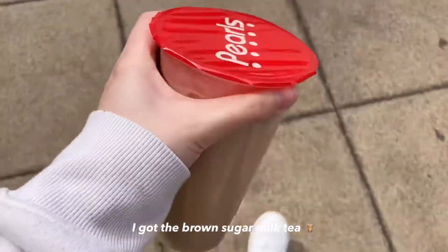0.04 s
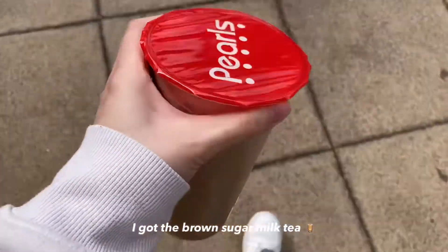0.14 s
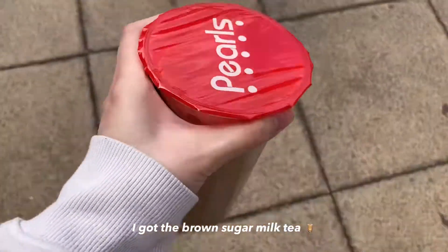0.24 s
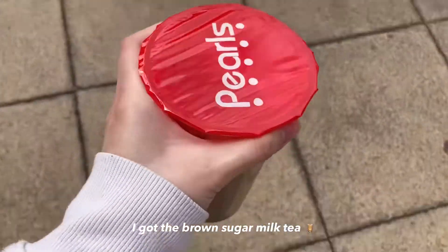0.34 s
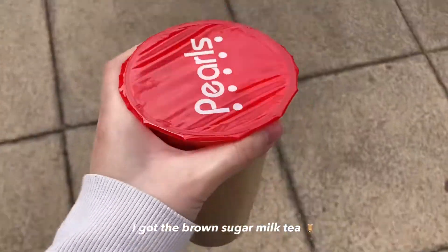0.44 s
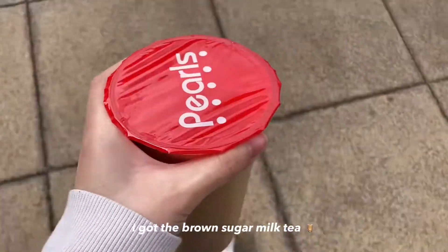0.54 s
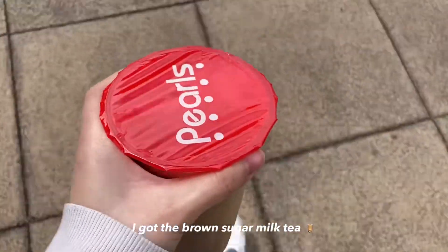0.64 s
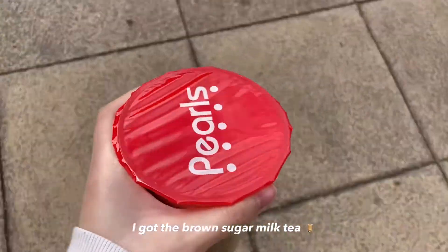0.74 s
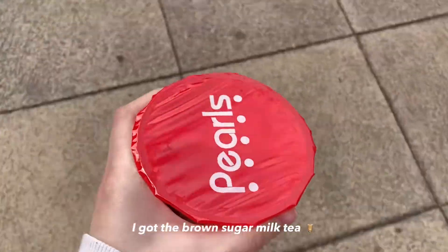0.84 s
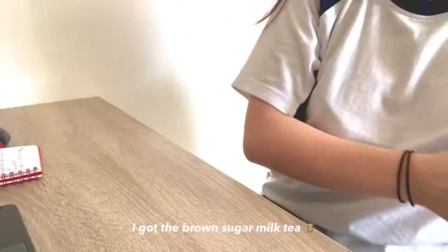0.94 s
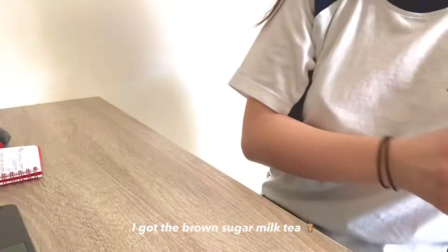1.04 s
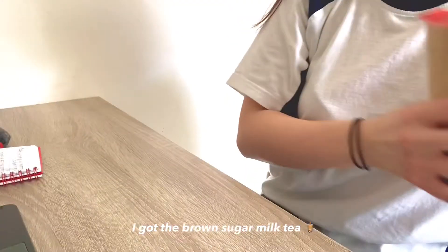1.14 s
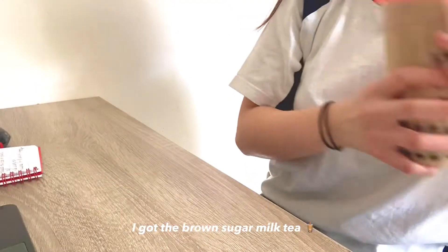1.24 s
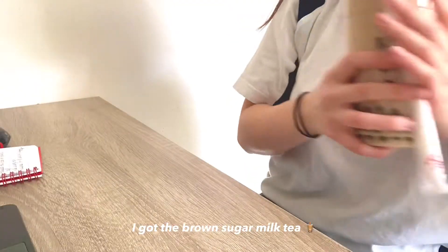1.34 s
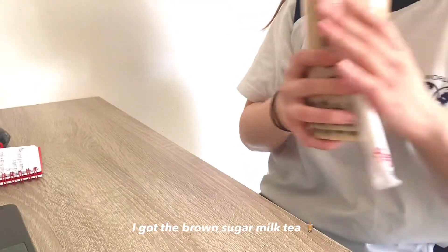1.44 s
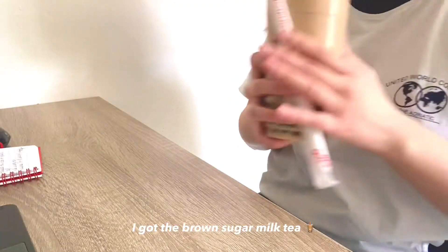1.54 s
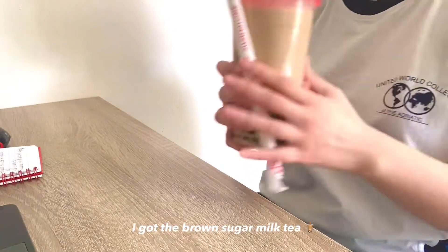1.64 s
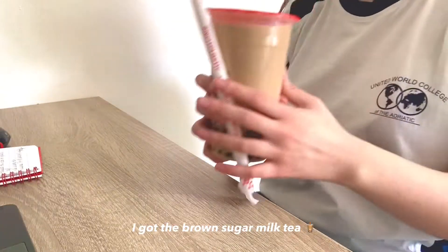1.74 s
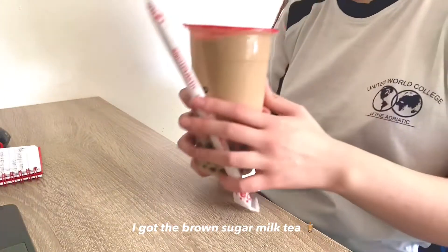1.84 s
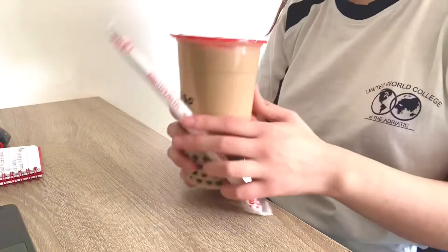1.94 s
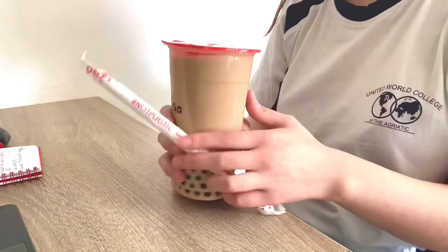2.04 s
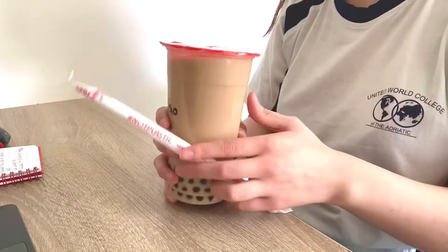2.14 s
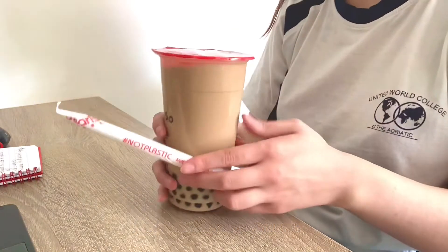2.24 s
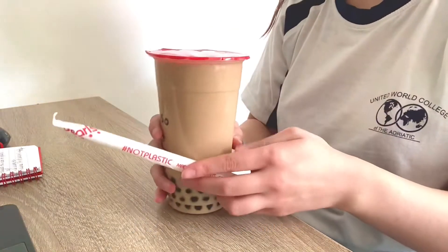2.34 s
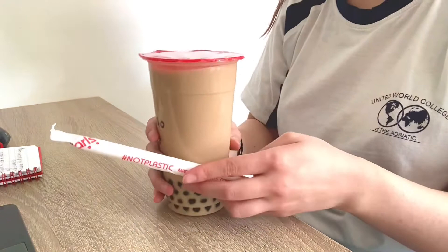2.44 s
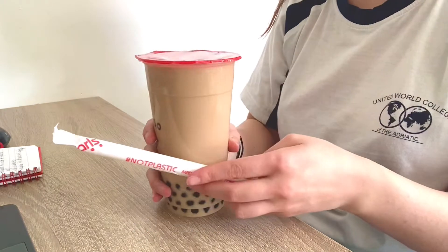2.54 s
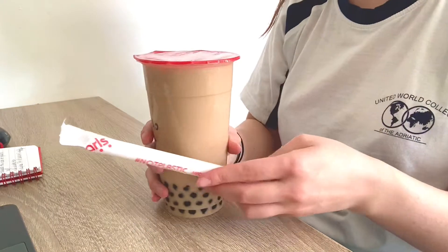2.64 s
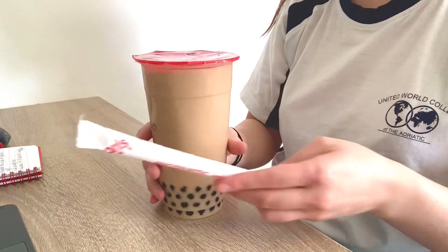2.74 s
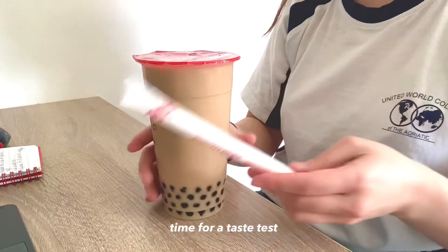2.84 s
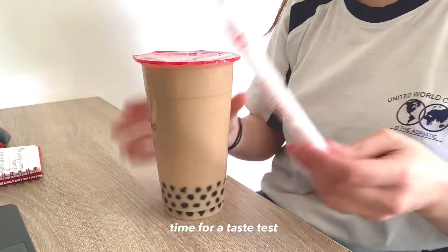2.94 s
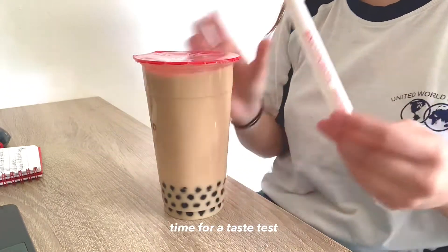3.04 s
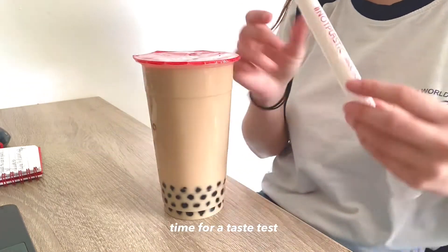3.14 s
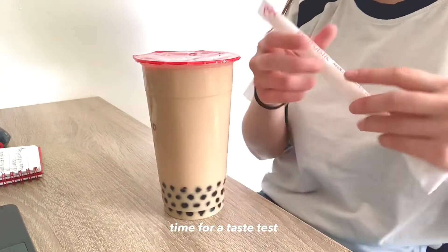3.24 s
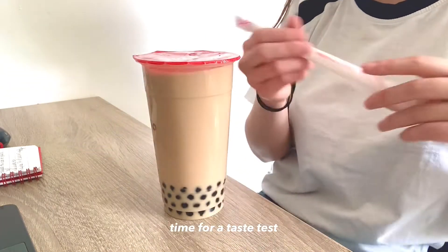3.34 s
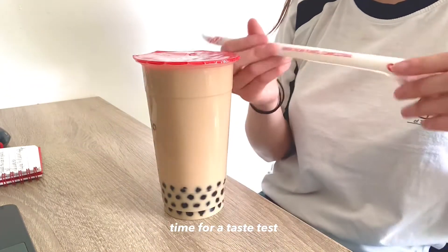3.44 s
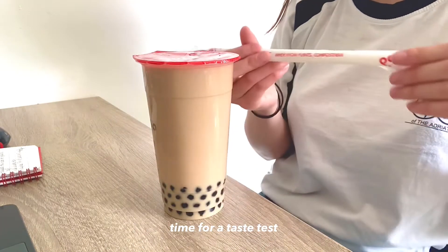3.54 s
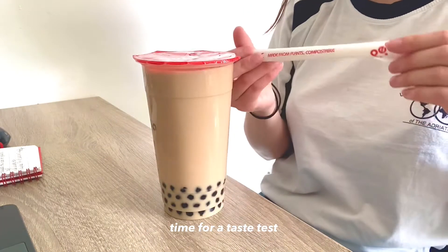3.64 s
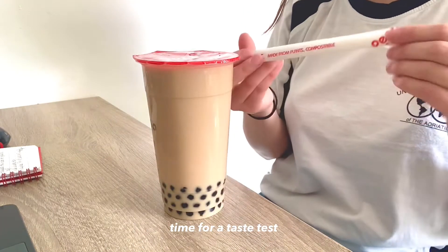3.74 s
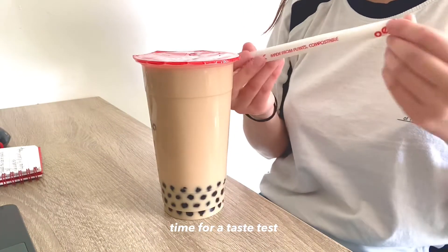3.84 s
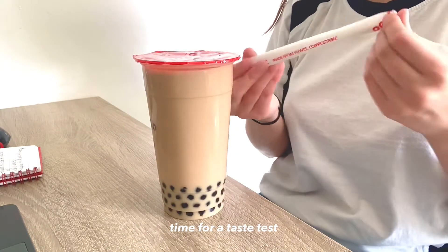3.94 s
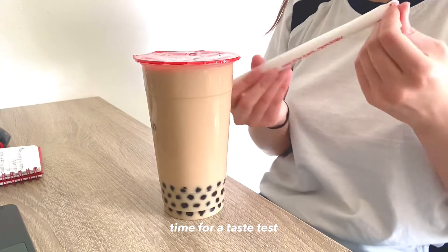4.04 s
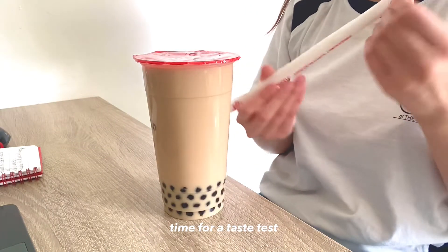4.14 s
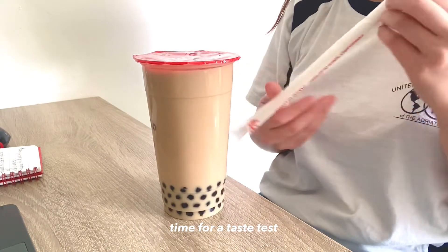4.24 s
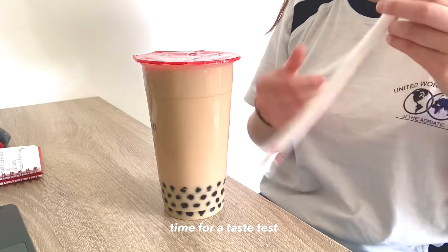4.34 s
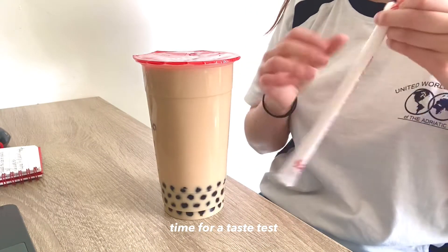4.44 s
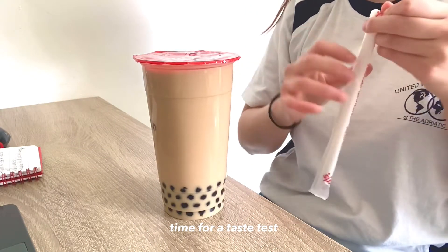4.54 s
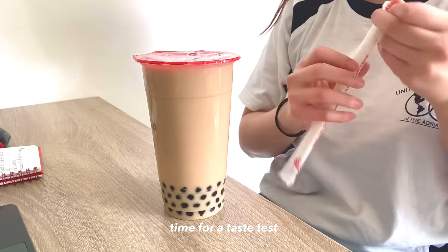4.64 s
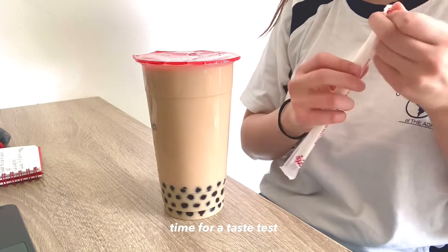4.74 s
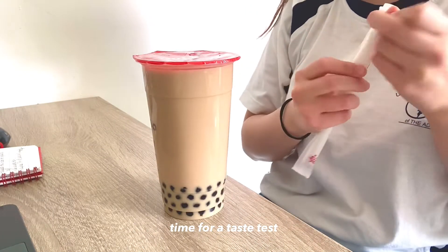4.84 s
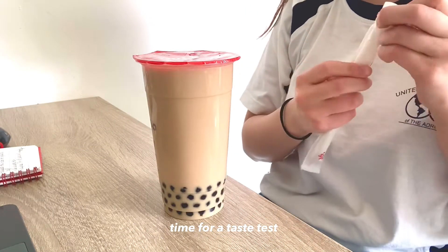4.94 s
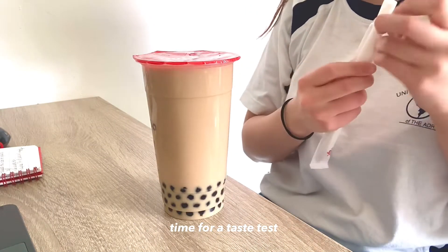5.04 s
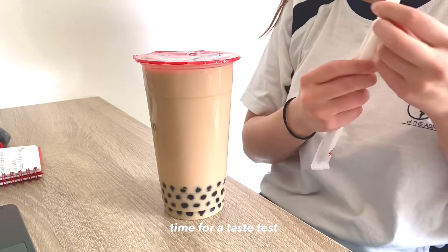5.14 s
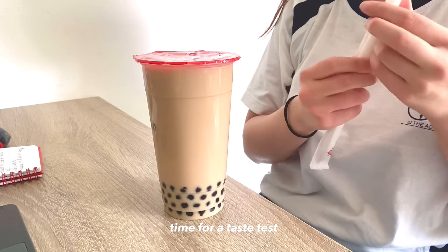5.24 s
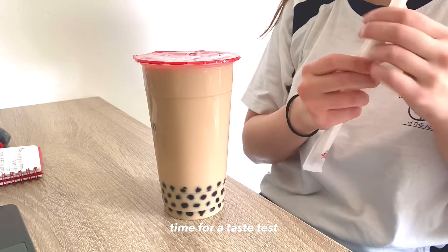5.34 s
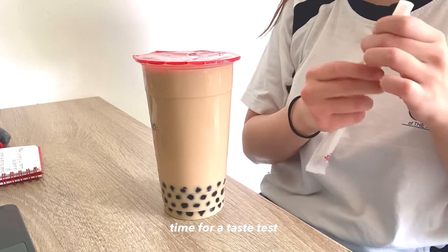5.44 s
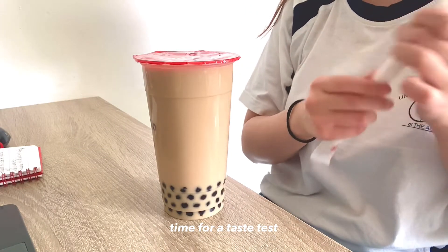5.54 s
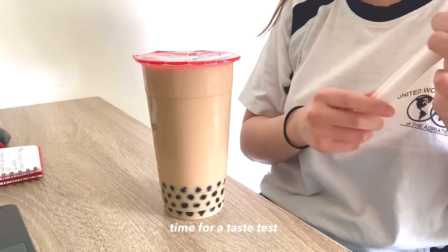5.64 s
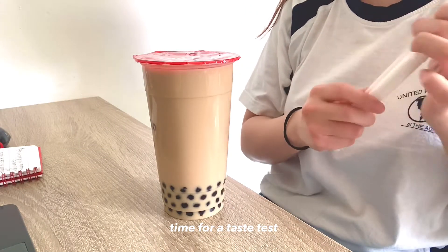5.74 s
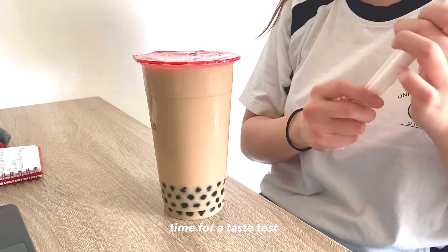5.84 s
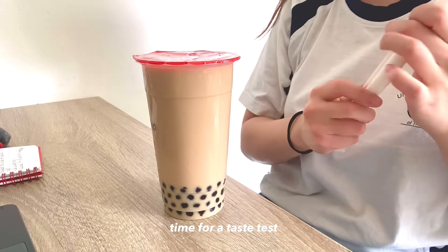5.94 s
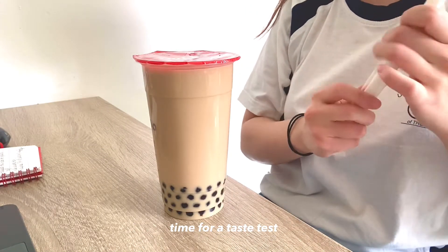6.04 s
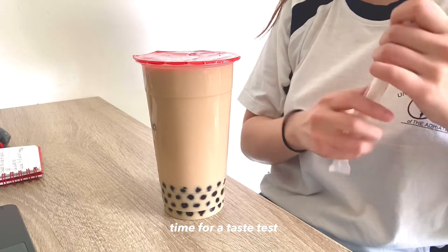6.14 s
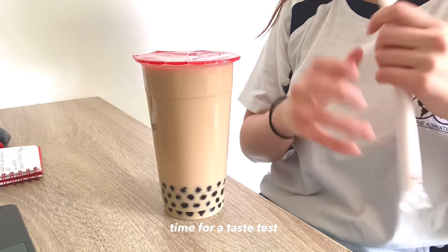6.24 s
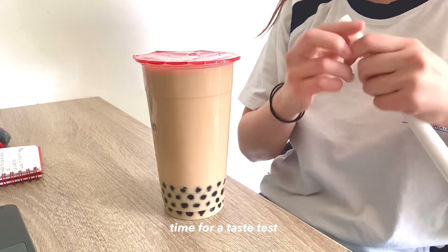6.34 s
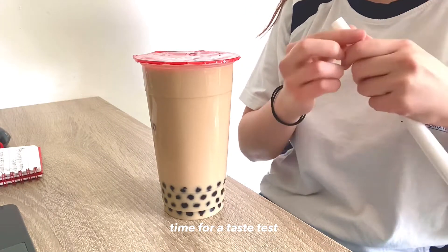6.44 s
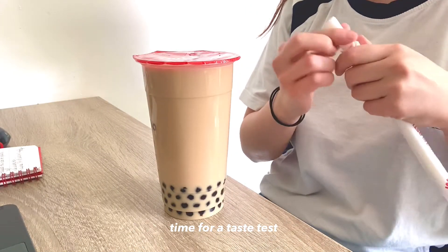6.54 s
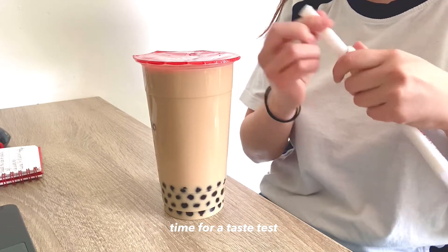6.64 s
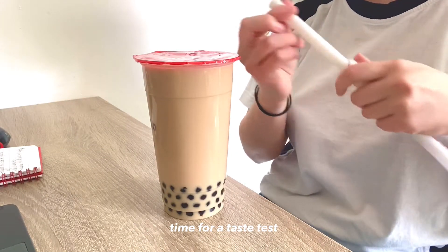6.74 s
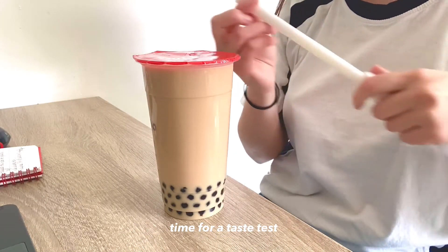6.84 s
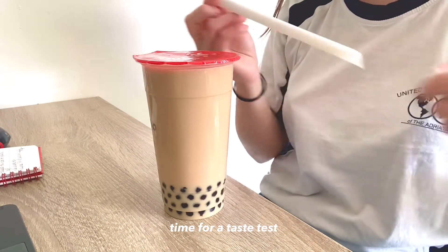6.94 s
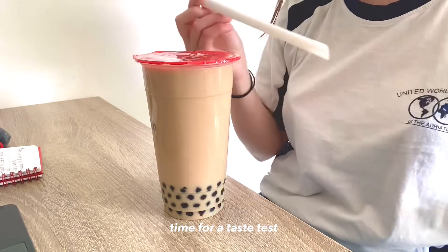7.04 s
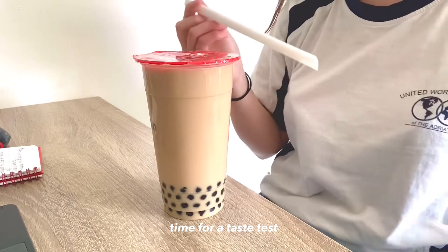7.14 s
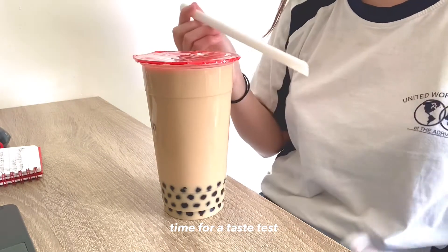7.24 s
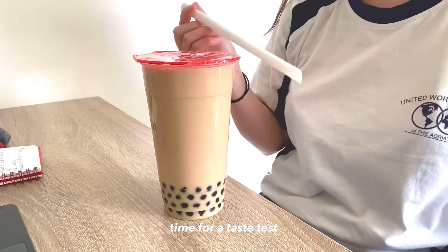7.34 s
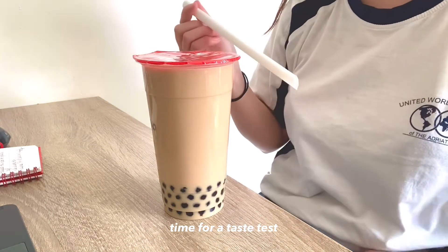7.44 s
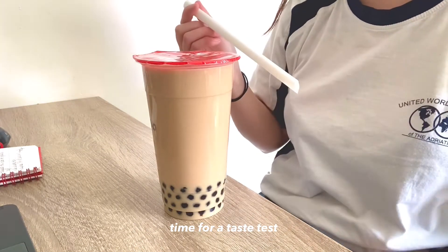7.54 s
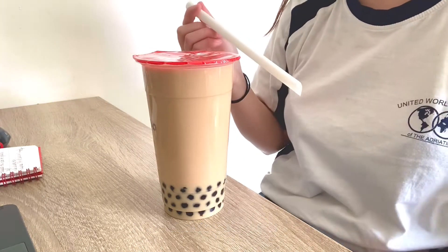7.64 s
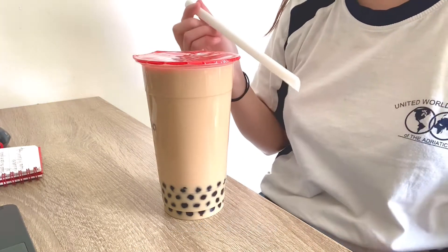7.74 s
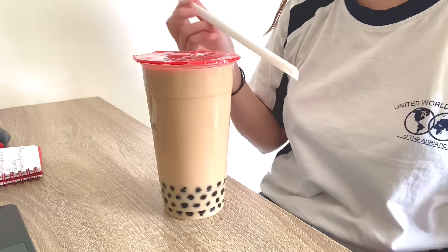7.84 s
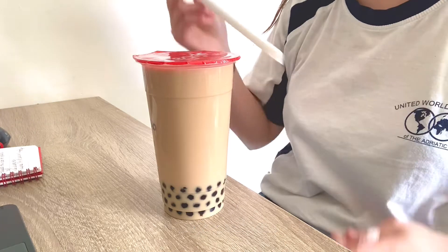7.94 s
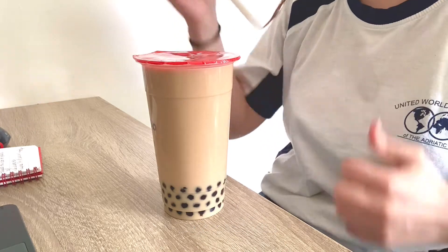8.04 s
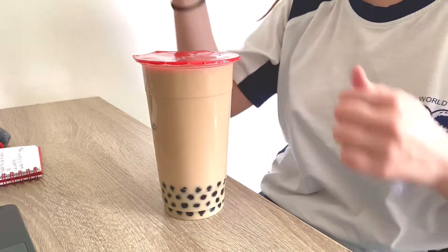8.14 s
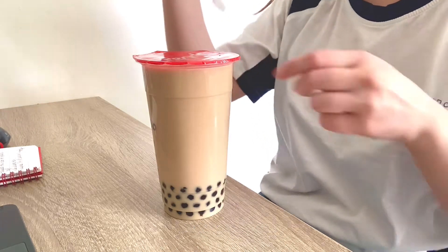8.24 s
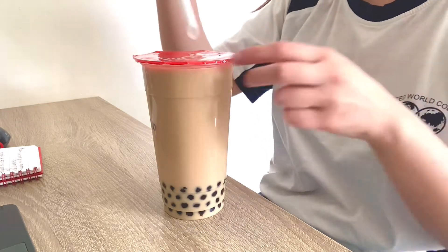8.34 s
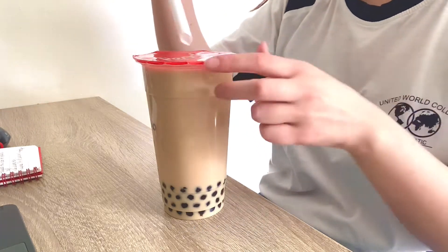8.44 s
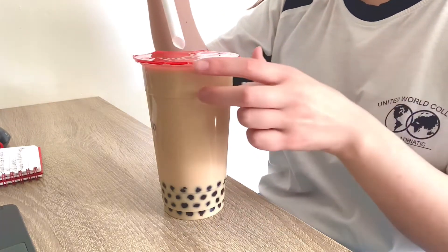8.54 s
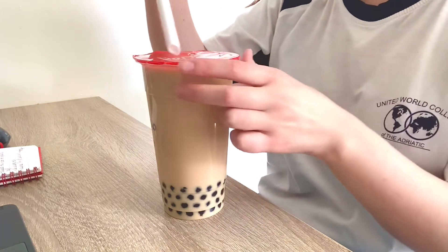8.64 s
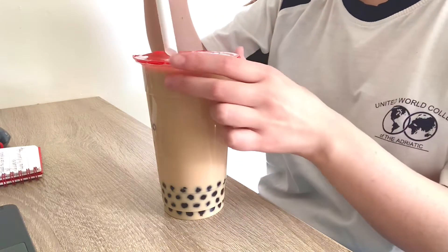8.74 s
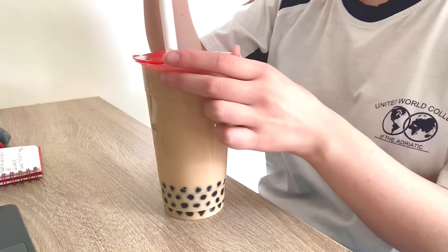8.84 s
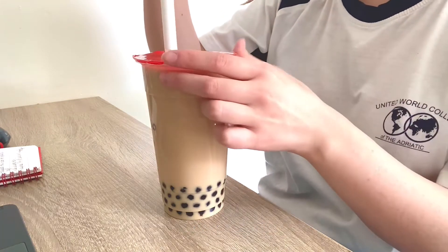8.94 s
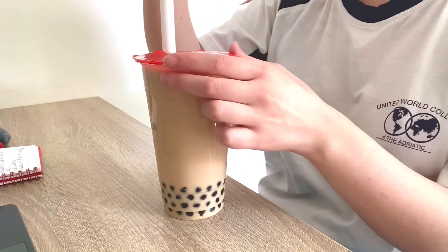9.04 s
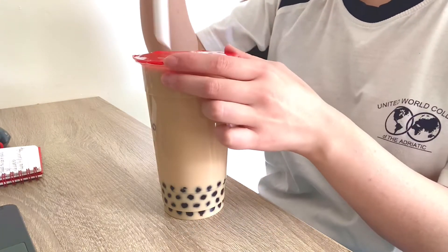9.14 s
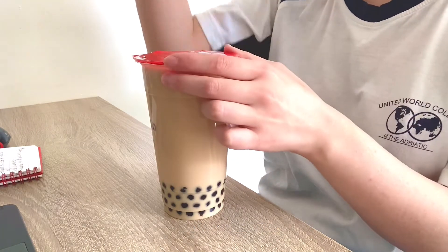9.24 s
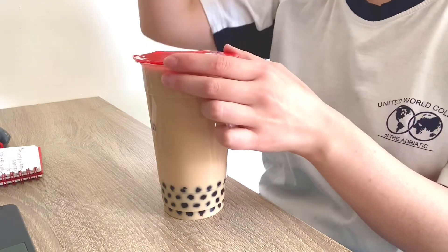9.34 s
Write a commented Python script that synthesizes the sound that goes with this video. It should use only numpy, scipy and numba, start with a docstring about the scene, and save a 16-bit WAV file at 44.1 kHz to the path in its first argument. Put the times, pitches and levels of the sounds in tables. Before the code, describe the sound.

From 0 to 0.9 seconds, low wind rumbles and buffets the microphone outdoors, strongest around 0.2, with faint film ticks. It cuts abruptly to a very quiet small room, heard close in stereo with a short tail. From 0.9 to 2 seconds, thin wrapping rustles and fingers tap and squeak on a plastic cup. Around 2.1 to 2.6 the full cup lands on the desk with dull, woody thuds and hollow knocks. After softer rustling, a crisp brush comes at 3.3; from 3.5 to 6.3 the wrapper crinkles in uneven bursts with sharp dry snaps, a stronger rub near 5.6. At 6.6 to 6.9 the straw slides out in a bright, growing hiss. Light brushing and crackles follow until 8.4. Short hollow pops with a tiny rattle strike the lid film at 8.7, with a faint desk bump, and again at 9.1, then a last small tick.

```python
"""First, wind rumbles on the microphone outdoors, as filtered noise whose bands swell with its eddies.
Then, at a desk in a small room, a full plastic cup is set down: the desk rings in decaying sine waves.
A wide straw is worked out of its thin wrapper: tiny ringing grains make the crinkling, the finger rub
and the hiss of the straw sliding out, while short noise bursts make the snapping creases.
At the end its tip pops through the taut film that seals the cup: brief tones with a rattle."""
import sys
import numpy as np
from scipy import signal
from scipy.fft import rfft, irfft
from scipy.io import wavfile
from scipy.ndimage import uniform_filter1d, map_coordinates
from numba import njit

SR = 44100
rng = np.random.default_rng(int(sys.argv[2]) if len(sys.argv) > 2 else 0)


def transcribe(u):
    """Save the signal u as a 16-bit wav file named by the first command-line argument.

    u: samples, shape (n,) or (channels, n), limited to [-1, 1]; the rate is SR.
    q: integer samples, one column per channel.
    """
    v = np.clip(np.atleast_2d(u).T, -1, 1)
    q = np.round(v * 32767).astype(np.int16)
    wavfile.write(sys.argv[1], SR, q)


N = 414981
T = np.arange(N) / SR  # time of every sample, in seconds

# Tone colour of the wind: pitch_hz, relative_level_db
WIND_SPECTRUM = [(20, -10), (60, 9.5), (300, -3), (470, -7.5), (700, -22), (1500, -28), (4000, -40),
                 (16000, -48)]
# Strength of the wind over time: time_s, level_db
WIND_GUST = [(0, -46.5), (.11, -42.5), (.18, -36.5), (.36, -43)]
# Tone colour of the quiet room: pitch_hz, relative_level_db
ROOM_SPECTRUM = [(20, -33), (50, 6.5), (90, -6), (145, 0), (300, -10), (1500, -22), (16000, -35.5)]
# Ringing modes of the desk: pitch_hz, relative_level_db, time_to_fall_60_db_s
DESK_MODES = [(49.6, -1, 0.33), (82, 1.5, 0.16), (134.3, 0.5, 0.26), (207, -4, 0.21), (294, 7, 0.075)]
# The cup and the hands bump the desk: start_s, relative_level_db, contact_s
DESK_BUMPS = [(2.061, -44.5, 0.014), (2.219, -44, 0.00092), (2.233, -26, 0.0047), (2.273, -37.5, 0.0038),
              (2.505, -41, 0.006), (8.703, -57.5, 0.0037)]
# Tone colour of the cup: pitch_hz, relative_level_db
CUP_SPECTRUM = [(100, -27), (330, 5.5), (470, 11), (740, -6.5), (2050, -0.5), (3000, -4.5), (4000, 0.5),
                (16000, -38)]
# Knocks on the cup or straw and pops of the lid: start_s, relative_level_db, pitch_hz
CUP_KNOCKS = [(1.219, -36, 1080), (1.6128, -41, 1230), (1.733, -43, 1310), (1.837, -38.5, 1400),
              (2.2437, -31.5, 1500), (2.2494, -36, 930), (2.5678, -40, 1580), (2.7161, -36, 1820),
              (2.736, -40, 1440), (5.324, -45, 2944), (6.914, -37.5, 1820), (7.2754, -43, 930),
              (8.686, -37, 1650), (8.7011, -32, 1700), (8.7055, -37.5, 1610), (9.1059, -37.5, 1900),
              (9.11, -33.5, 1800), (9.1332, -38.5, 1700), (9.1695, -36.5, 1760)]
# Plastic catches and slips in a quick run (fingers on the cup, wrapper on the straw, straw on the lid):
# start_s, length_s, level_db, pitch_hz
STICK_SLIPS = [(0.877, 0.09, -61.5, 3000), (1.417, 0.033, -57, 1130), (1.45, 0.018, -47.5, 1320),
               (3.352, 0.011, -42, 3860), (3.385, 0.05, -53.5, 844), (5.616, 0.014, -46, 2250)]
# The fingers pinch and crush the wrapper: start_s, hold_s, relative_level_db
PINCHES = [(1.203, 0.01, -40.5), (3.287, 0.019, -41), (3.578, 0.012, -49), (3.776, 0.038, -48),
           (3.868, 0.15, -51.5), (4.011, 0.039, -49), (4.178, 0.076, -48), (4.386, 0.025, -57.5),
           (4.597, 0.0087, -46.5), (4.645, 0.14, -55), (4.762, 0.047, -44.5), (4.83, 0.018, -43),
           (4.968, 0.1, -52.5), (5.144, 0.51, -55), (5.256, 0.053, -48.5), (5.317, 0.058, -49.5),
           (5.671, 0.013, -39), (5.742, 0.036, -37.5), (5.803, 0.037, -47), (6.062, 0.11, -44),
           (6.193, 0.023, -42.5), (6.285, 0.027, -51.5), (6.495, 0.08, -57), (7.127, 0.0059, -50.5),
           (8.655, .11, -54)]
# The wrapper is brushed along the straw or cup:
# start_s, length_s, relative_level_db, finger_rub_db (relative to that level)
STROKES = [(0.888, 0.42, -56, -5), (1.095, 0.63, -56.5, -9), (1.713, 0.63, -53.5, -6.5),
           (1.939, 0.11, -47.5, -5), (2.336, 0.28, -64.5, -3), (2.77, 0.29, -64.5, -10),
           (3.004, 1.31, -56.5, -10), (3.303, 0.18, -44.5, -8), (3.388, 0.063, -42, -18),
           (4.559, 0.044, -66, 0.5), (5.386, 0.29, -54.5, -18), (5.495, 0.18, -40, -11.5),
           (6.042, 0.069, -54, -5.5), (6.974, 0.092, -44, -23.5), (7.056, 1, -56, -10.5),
           (7.356, 0.11, -46, -5), (7.487, 0.21, -47, -7), (7.725, 0.21, -47, -11.5),
           (7.953, 0.087, -45, -17.5), (8.117, 0.16, -51, -26), (8.195, 0.08, -39, -27),
           (8.344, 0.081, -48.5, -16.5), (8.43, 0.23, -63.5, -13), (8.773, 0.3, -59, -11)]
# Tone colour of finger friction: pitch_hz, relative_level_db
FINGER_SPECTRUM = [(100, -19), (250, -11), (1200, -1), (2600, 3.5), (4300, -2), (9000, -32), (16000, -8)]
# Resonances of the air in the straw: pitch_hz, width_hz, relative_level_db
STRAW_RESONANCES = [(440, 120, -3), (900, 150, -4.5)]
# Creases of the lid film and wrapper that snap through: start_s, relative_level_db (over 1 ms)
CREASE_SNAPS = [(0.223, -53), (0.337, -57), (0.728, -44), (1.217, -35.5), (1.396, -36), (1.811, -35),
                (1.837, -38), (2.027, -30), (2.073, -37), (2.391, -39), (2.445, -45), (2.467, -41),
                (3.042, -43.5), (3.212, -42.5), (3.536, -40.5), (3.673, -38), (3.876, -36), (3.924, -34.5),
                (3.968, -34.5), (4.014, -34), (4.164, -41.5), (4.188, -36), (4.203, -40), (4.216, -39),
                (4.231, -29.5), (4.343, -38), (4.356, -31.5), (4.398, -38), (4.407, -40), (4.646, -35),
                (4.709, -40), (4.747, -35.5), (4.77, -31.5), (4.845, -39), (4.943, -36), (4.973, -33),
                (4.9998, -33), (5.0148, -36), (5.02, -35), (5.035, -37), (5.143, -38.5), (5.212, -43),
                (5.241, -35.5), (5.262, -35), (5.27, -31.5), (5.374, -35), (5.491, -35), (5.682, -31),
                (5.717, -34), (5.902, -43.5), (6.067, -32.5), (6.131, -43), (6.955, -37.5), (8.291, -35.5),
                (8.688, -36), (8.87, -38.5), (9.249, -43.5)]
# Tone colour of the crinkling wrapper: pitch_hz, relative_level_db
CRINKLE_SPECTRUM = [(900, -28.5), (2000, -4), (3800, -3.5), (7200, 0.5), (8800, 3), (11000, 1),
                    (14000, -0.5), (16000, -4)]
# Tone colour of the sliding straw: pitch_hz, relative_level_db
SLIDE_SPECTRUM = [(200, -59), (900, -27), (3500, -8.5), (7200, -4), (8600, 3.5), (11000, -0.5), (14000, 3),
                  (16000, -6.5)]

OUTDOORS_END_S = .883
WRAPPER_LAG_S, CUP_LAG_S = .000228, .0001  # how much later the left port hears each source
TOP_HZ = 15800
# A pinch builds quickly, sags while it is held and lets go
PINCH_ATTACK_S, PINCH_SAG_DB_PER_S, PINCH_RELEASE_S, PINCH_RUB_DB = 0.0011, 4, 0.022, -14
# A stroke swells and fades in an arch; a lower power makes it flatter
STROKE_ARCH_POWER = 0.39
# After any touch the sheet keeps unfolding, fainter and fainter
SETTLE_DB, SETTLE_DB_PER_S = -4.5, 169
# Level of the crinkling against the hiss of the sliding straw
CRINKLE_DB = -0.5
# The straw gathers speed as it is drawn out
SLIDE_START_S, SLIDE_END_S, SLIDE_EDGE_S = 6.565, 6.92, 0.027
SLIDE_DB, SLIDE_RISE_DB_PER_S, SLIDE_RUB_DB = -39.5, 13.5, -24
# Creases give way in little avalanches; the shares say how much of the crackle comes in such bursts
AVALANCHE_MEDIAN_GAP_S, AVALANCHE_DECAY_S = 1 / 85, .0014
PINCH_SHARE, STROKE_SHARE = .85, .25


def gain(db):
    """Turn decibels into a multiplying factor."""
    return 10 ** (np.asarray(db) / 20)


def unit(x):
    """Scale a sound to an average (rms) strength of 1."""
    return x / np.sqrt(np.mean(x ** 2))


def level_over(x, seconds):
    """Strength a sound would have if all its energy were packed into the given time."""
    return np.sqrt(np.sum(x ** 2) / (seconds * SR))


def walk(rate):
    """Wander at random with rms 1, by straight lines between `rate` random points a second."""
    knots = rng.standard_normal(4096)
    return unit(np.interp(T * rate, np.arange(len(knots)), knots))


def colour(x, points, size=4096):
    """Filter a sound to follow (Hz, dB) points, with no sound ahead of its cause (minimum phase)."""
    hz, db = np.transpose(points)
    f = np.maximum(np.fft.rfftfreq(size, 1 / SR), 1)
    log_gain = np.log(gain(np.interp(np.log(f), np.log(hz), db)))
    # fold the cepstrum forward in time to get the minimum-phase filter
    cepstrum = irfft(log_gain)
    cepstrum[1:size // 2] *= 2
    cepstrum[size // 2 + 1:] = 0
    impulse = irfft(np.exp(rfft(cepstrum)))
    return signal.fftconvolve(x, impulse)[:len(x)]


def resonate(x, hz, width_hz):
    """Pass a sound through one resonance with gain 1 at its centre."""
    return signal.lfilter(*signal.iirpeak(hz, hz / width_hz, fs=SR), x)


def add(track, start_s, sound):
    """Mix a sound into a track at its start time."""
    i = int(start_s * SR)
    track[i:i + len(sound)] += sound[:N - i]


def shift(x, depth_db, per_s, per_octave):
    """Resonances come and go as the sheet bends all the time; eddies do the same to moving air."""
    f, t, bands = signal.stft(x, SR, nperseg=512)
    octaves = np.log2(1 + f / 300)
    place = np.meshgrid(octaves * per_octave, t * per_s, indexing="ij")
    bends = map_coordinates(rng.standard_normal((96, 1024)), place, order=1, mode="wrap")
    return signal.istft(bands * gain(depth_db * bends), SR, nperseg=512)[1][:N]


@njit
def ring(starts, sizes, poles, count):
    """Ring each grain as a tiny damped oscillation, `count` samples long."""
    out = np.zeros(N + count)
    for k in range(len(starts)):
        z = sizes[k] + 0j
        for i in range(count):
            out[starts[k] + i] += z.real
            z *= poles[k]
    return out[:N]


def grains(rate, spread_db, width_hz=2200):
    """Fibres and tiny creases give way at random: many small, a few large, each with its own pitch."""
    when, size, pitch, side = rng.random((4, N))
    starts = np.flatnonzero(when < rate / SR)  # about `rate` grains a second
    excess = -np.log(np.maximum(size[starts], .03))
    sizes = gain(spread_db * excess) * np.sign(side[starts] - .5)
    # pitches reach up to 0.8 of half the sample rate; a greater width dies away faster
    poles = np.exp((1j * pitch[starts] * .8 - width_hz / SR) * np.pi)
    return unit(ring(starts, sizes, poles, count=160))


def air(spectrum, apart_hz, pan_db, eddy_db):
    """Moving air has eddies that swell band by band; both ports share the bass but not the treble."""
    mid, side = (shift(colour(rng.standard_normal(N), spectrum), eddy_db, per_s=20, per_octave=4.56)
                 for _ in range(2))
    side = signal.lfilter(*signal.butter(1, apart_hz, "high", fs=SR), side)
    return unit(np.array([(mid + side) * gain(pan_db), mid - side]))


def room(x, lag_s, pan_db, early_db, tail_db, t60=0.31, early_s=0.0028):
    """The right port hears the sound lag_s sooner; hands and desk scatter it, walls add a short tail."""
    t, ears = T[:SR // 3], []
    f = np.fft.rfftfreq(N, 1 / SR)
    # once the lag exceeds a whole cycle, the stereo image folds over and the levels even out
    phase = np.pi * f * lag_s * np.where(f * lag_s < 1, 1, -1)
    lean_db = pan_db / 2 / (1 + (f * lag_s) ** 2)
    scattered = colour(x, [(800, 2), (3500, 4), (8500, -5)])
    # as the hands move, one set of short echoes gives way to another
    pose = 2 * np.pi * 2 * T + walk(5)
    for side in (1, -1):  # left, right
        direct = irfft(rfft(x) * gain(side * lean_db) * np.exp(-1j * side * phase), N)
        early = rng.standard_normal((2, len(t))) * (t > .0025) * np.exp(-t / early_s)
        tail = rng.standard_normal(len(t)) * (t > 2 * early_s) * np.exp(-np.log(1000) * t / t60)
        near, far, walls = (signal.oaconvolve(scattered, echo / np.linalg.norm(echo))[:N]
                            for echo in (*early, tail))
        echoes = near * np.cos(pose) + far * np.sin(pose)
        ears.append(direct + gain(early_db) * echoes + gain(tail_db) * walls)
    return np.array(ears)


def desk(scuff_db=-19, scuff_s=0.037):
    """Soft, heavy contacts ring the desk and scuff its top; longer ones leave only the lowest modes."""
    out, t = np.zeros(N), T[:SR // 2]
    modes = sum(gain(db) * np.sin(2 * np.pi * hz * t) * np.exp(-np.log(1000) * t / t60)
                for hz, db, t60 in DESK_MODES)
    for start_s, db, contact_s in DESK_BUMPS:
        push = np.sin(np.pi * np.minimum(t / contact_s, 1))
        thud = signal.fftconvolve(push / push.sum(), modes)[:len(t)]
        noise = colour(rng.standard_normal(len(t)), [(380, -8.5), (1000, -20.0), (5000, -35.0)])
        scuff = unit(noise) * np.exp(-t / scuff_s)
        add(out, start_s, gain(db) * (gain(scuff_db) * scuff - thud))
    return out


def cup(gain_db=-3, flex_s=0.00071, width_hz=550, broad=0.28, shell_s=0.038, shell_db=-19):
    """The cup wall or lid film flicks over: a short hollow pop, coloured by the shell."""
    out, t = np.zeros(N), T[:4096]
    swell = t / flex_s * np.exp(1 - t / flex_s)
    for start_s, db, hz in CUP_KNOCKS:
        rattle = rng.standard_normal(len(t)) * (swell + gain(shell_db) * np.exp(-t / shell_s) * 2)
        tone = np.sin(2 * np.pi * hz * t) * swell
        pop = colour(tone + 2 * resonate(rattle, hz, width_hz) + broad * rattle, CUP_SPECTRUM)
        add(out, start_s, pop * gain(db + gain_db) / level_over(pop, .001))
    return out


def judders(slips_per_s=500, width=0.26, broad=0.25):
    """Uneven slips in quick succession keep one patch of plastic ringing."""
    out, t = np.zeros(N), T[:4096]
    for start_s, length_s, db, hz in STICK_SLIPS:
        # each slip starts strong and weakens until the next
        progress = np.cumsum(rng.exponential(size=len(t))) * slips_per_s / SR % 1
        arch = np.sqrt(np.maximum(t * (length_s - t), 0))
        force = np.exp(-2 * progress) * rng.standard_normal(len(t)) * arch
        patch = resonate(resonate(force, hz, 2 * width * hz), hz, width * hz)
        sound = patch + broad * resonate(force, hz, 2 * hz)
        add(out, start_s, sound * gain(db) / level_over(sound, length_s))
    return out


def press(start_s, hold_s, slope_db_per_s, attack_s, release_s):
    """A touch builds up, sags or grows while held, and lets go."""
    out, t = np.zeros(N), T[T < hold_s + 10 * release_s]
    held = gain(slope_db_per_s * np.minimum(t, hold_s))
    release = np.exp(-np.maximum(t - hold_s, 0) / release_s)
    add(out, start_s, np.minimum(t / attack_s, 1) * held * release)
    return out


def settle(power):
    """Turn the power of a movement into dB and add the slow unfolding that follows it."""
    db = 10 * np.log10(power + 1e-12)
    fall_db = SETTLE_DB_PER_S * T
    unfolding_db = np.maximum.accumulate(db + fall_db) - fall_db + SETTLE_DB
    return np.maximum(db, unfolding_db)


def hands():
    """Pinches, strokes and the pull add up to crinkle and rub levels in dB, and the pinches' share."""
    hold_s = SLIDE_END_S - SLIDE_START_S - SLIDE_EDGE_S
    pull = press(SLIDE_START_S, hold_s, SLIDE_RISE_DB_PER_S, SLIDE_EDGE_S, SLIDE_EDGE_S)
    crinkle = (gain(SLIDE_DB) * pull) ** 2
    rub = crinkle * gain(SLIDE_RUB_DB) ** 2
    pinched = 0
    for start_s, hold_s, db in PINCHES:
        grip = press(start_s, hold_s, -PINCH_SAG_DB_PER_S, PINCH_ATTACK_S, PINCH_RELEASE_S)
        pinched = pinched + (gain(db) * grip) ** 2
    crinkle = crinkle + pinched
    rub = rub + pinched * gain(PINCH_RUB_DB) ** 2
    for start_s, length_s, db, rub_db in STROKES:
        arch = np.sin(np.pi * T[T < length_s] / length_s) ** STROKE_ARCH_POWER
        add(crinkle, start_s, (gain(db) * arch) ** 2)
        add(rub, start_s, (gain(db + rub_db) * arch) ** 2)
    return settle(crinkle), settle(rub), pinched / np.where(crinkle > 0, crinkle, 1)


def fingers(rub_db, db=-1, catch_db=4.0, tube_db=5):
    """Fingers catch and slip on the wrapped straw and sound its air column."""
    friction = colour(grains(rate=2600, spread_db=0.5), FINGER_SPECTRUM)
    tube = sum(gain(level_db + tube_db) * resonate(friction, hz, width_hz)
               for hz, width_hz, level_db in STRAW_RESONANCES)
    rub = shift(friction + tube, depth_db=4, per_s=22, per_octave=5)
    return unit(rub) * gain(rub_db + db + catch_db * walk(55))


def snaps(gain_db=2.0, centre_hz=8700, spread_octaves=0.56, width_hz=4200, broad=0.2, settle_db=-26,
          follow_db=-11, facet_db=-1):
    """A crease buckles within a millisecond and rings a facet; a neighbour follows, the sheet settles."""
    out, t = np.zeros(N), T[:1024]
    buckle_s, settle_s = .00045, .006
    buckle = t / buckle_s * np.exp(1 - t / buckle_s)
    for start_s, db in CREASE_SNAPS:
        delay, facet, crease = 1 + rng.random(3)  # each between 1 and 2
        hz = centre_hz * (crease / np.sqrt(2)) ** np.clip(spread_octaves, 0, 1)
        follower = gain(follow_db) * np.interp(t - delay * settle_s / 2, t, buckle)
        settling = gain(settle_db) * np.exp(-t / settle_s)
        burst = (buckle + follower + settling) * rng.standard_normal(len(t))
        # the facet has a random size and rings one to two octaves below the crease
        rings = resonate(burst, hz, width_hz) + gain(facet_db) * resonate(burst, hz / facet / 2, 790)
        snap = colour(rings + broad * burst, [(300, -15.0), (3500, -1.0), (7000, 2.5), (9000, 1.5)])
        add(out, start_s, snap * gain(db + gain_db) / level_over(snap, .001))
    return out


def avalanches():
    """Creases give way in sudden uneven bursts that die in milliseconds; returns power with mean 1."""
    gap, size = rng.standard_normal((4096, 2)).T
    starts = (np.cumsum(np.exp(gap / 2)) * SR * AVALANCHE_MEDIAN_GAP_S).astype(int)
    kicks = np.bincount(starts, np.exp(np.minimum(size, 1)), N)[:N]
    power = signal.lfilter([1], [1, -np.exp(-1 / (AVALANCHE_DECAY_S * SR))], kicks)
    return power / power.mean()


def wrapper(effort_db, pinching, lone_db=-2):
    """Pinches crackle, strokes rustle, and the straw slides out with a bright hiss."""
    # single crackles stand out less as the handling gets stronger
    lone_level_db = lone_db - .45 * np.maximum(effort_db + 54, 0)
    lone = grains(rate=380, spread_db=4.4, width_hz=750) * gain(lone_level_db)
    share = np.clip(PINCH_SHARE * pinching, STROKE_SHARE, 1)
    bursts = np.sqrt(1 - share + share * avalanches())
    dense = grains(rate=9000, spread_db=2.4) * gain(-3.5 + 2 * walk(60)) * bursts
    crinkle = colour(lone + dense, CRINKLE_SPECTRUM)
    crinkle = unit(shift(crinkle, depth_db=2.5, per_s=45, per_octave=4.01))
    slide = unit(colour(grains(rate=11000, spread_db=1.5), SLIDE_SPECTRUM)) * gain(0.53 * walk(260))
    # the switch between crinkle and slide is smoothed over 900 samples
    sliding = uniform_filter1d(1. * ((T > SLIDE_START_S) & (T < SLIDE_END_S)), size=900)
    return gain(effort_db) * (gain(CRINKLE_DB) * crinkle * (1 - sliding) + slide * sliding)


def scene():
    """A moment of wind outdoors, then the desk; room tone and the lid film's snaps span both."""
    outdoors = np.clip((OUTDOORS_END_S - T) / .01, 0, 1)  # fades out over 10 ms
    gust_db = np.interp(T, *np.transpose(WIND_GUST))
    wind = air(WIND_SPECTRUM, apart_hz=323, pan_db=1.0, eddy_db=4.2) * gain(gust_db)
    room_tone = gain(-71.0) * air(ROOM_SPECTRUM, apart_hz=294, pan_db=0.0, eddy_db=5.0)
    thuds = room(desk(), CUP_LAG_S, pan_db=3.0, early_db=-5.5, tail_db=-12.0)
    knocks = room(cup() + judders(), CUP_LAG_S, pan_db=-3, early_db=-6, tail_db=-13)
    effort_db, rub_db, pinching = hands()
    handling = wrapper(effort_db, pinching) + fingers(rub_db)
    rustle = handling * (1 - outdoors) + snaps()
    straw = room(rustle, WRAPPER_LAG_S, pan_db=-2.5, early_db=-4.5, tail_db=-13.5)
    return outdoors * wind + room_tone + thuds + knocks + straw


def record(dry):
    """The recorder cuts the deepest bass, below 36 Hz, and the top, above TOP_HZ."""
    dry = signal.sosfilt(signal.butter(4, 36, "high", fs=SR, output="sos"), dry)
    return signal.sosfilt(signal.ellip(10, .2, 80, TOP_HZ, fs=SR, output="sos"), dry)


dry = scene()
out = record(dry)
transcribe(out)
```